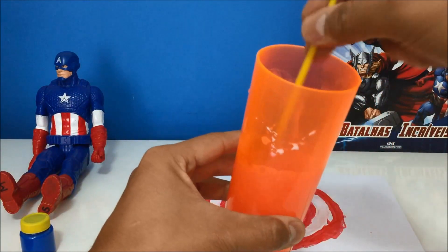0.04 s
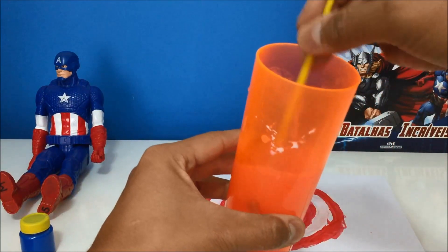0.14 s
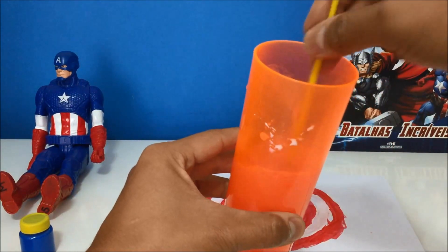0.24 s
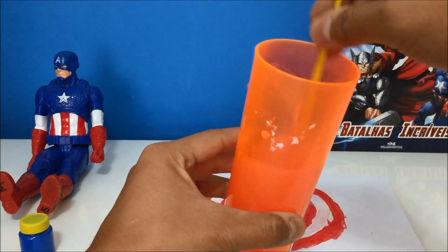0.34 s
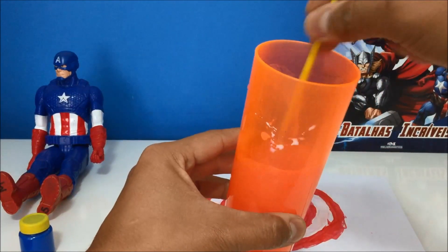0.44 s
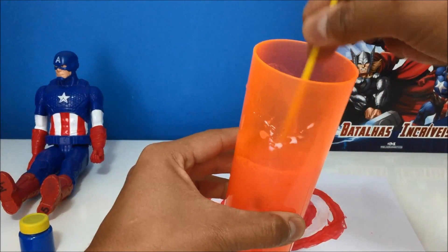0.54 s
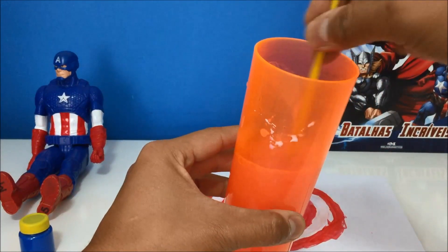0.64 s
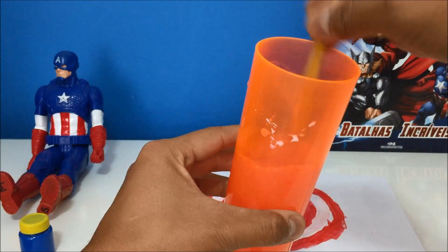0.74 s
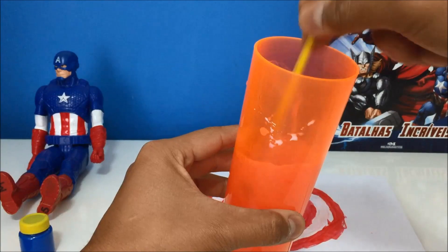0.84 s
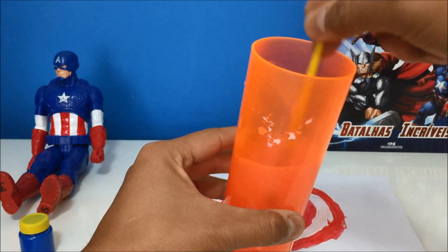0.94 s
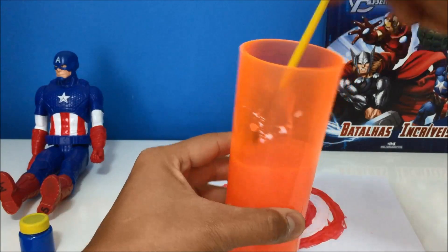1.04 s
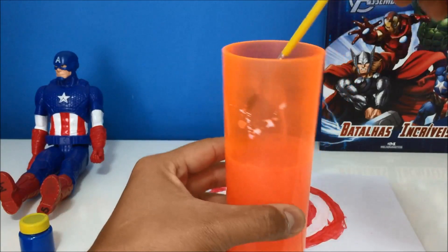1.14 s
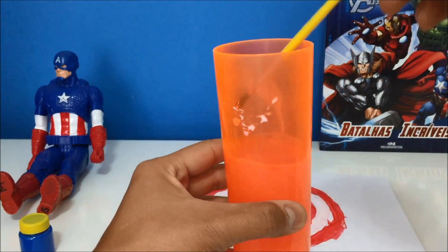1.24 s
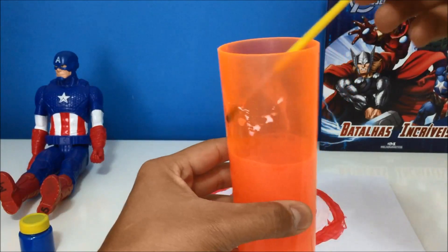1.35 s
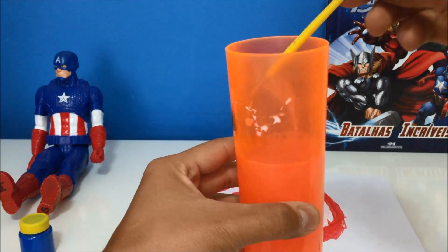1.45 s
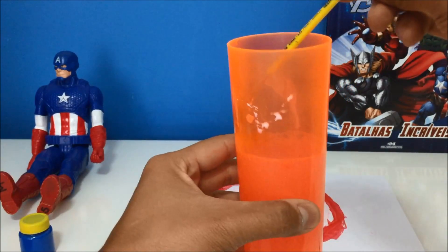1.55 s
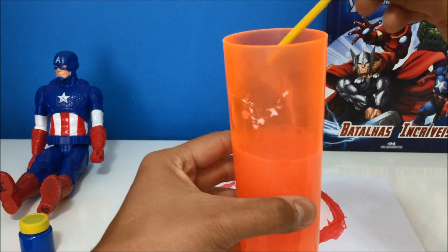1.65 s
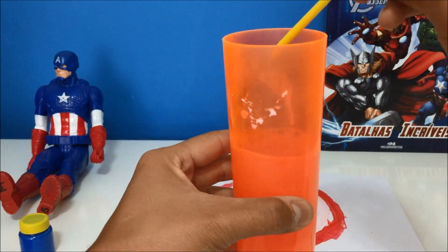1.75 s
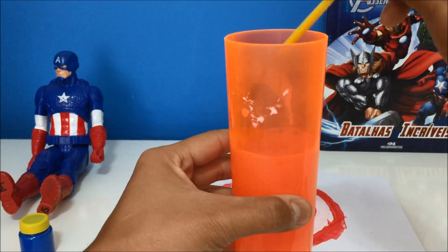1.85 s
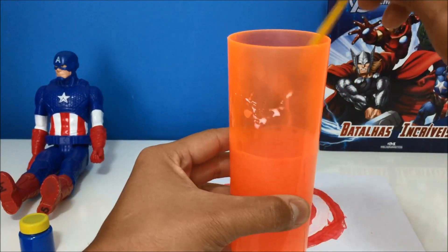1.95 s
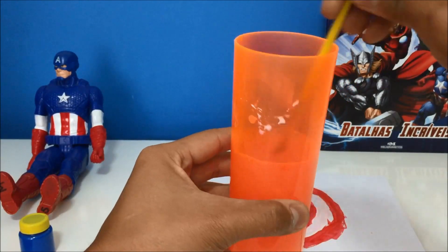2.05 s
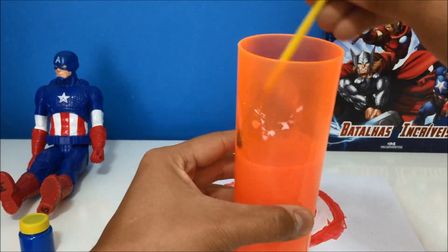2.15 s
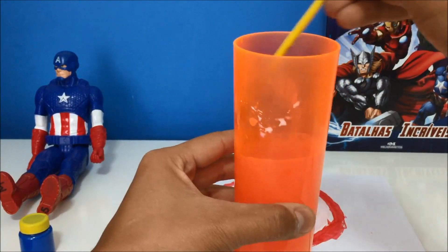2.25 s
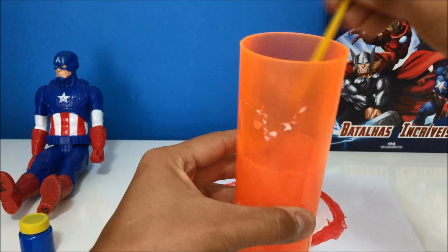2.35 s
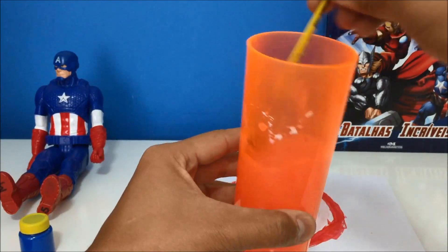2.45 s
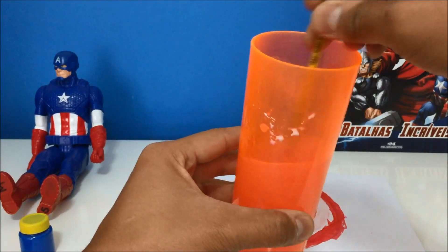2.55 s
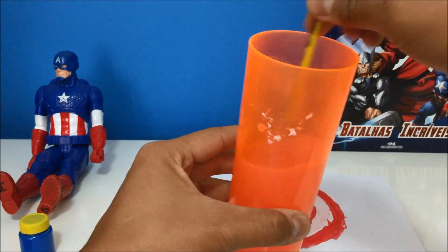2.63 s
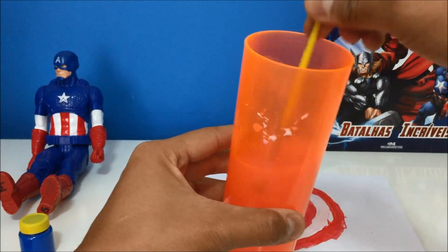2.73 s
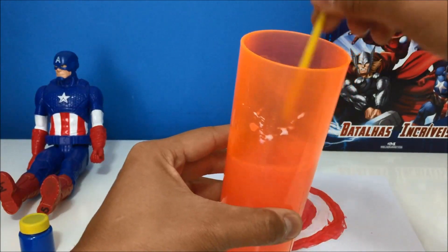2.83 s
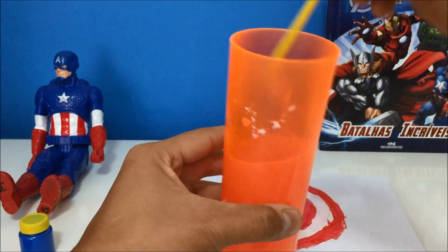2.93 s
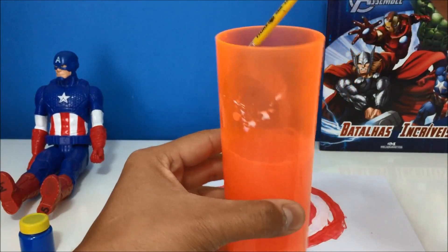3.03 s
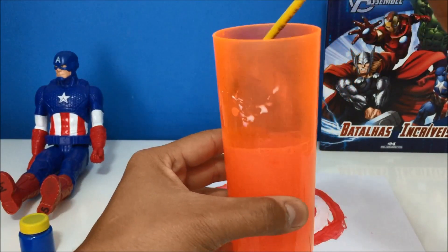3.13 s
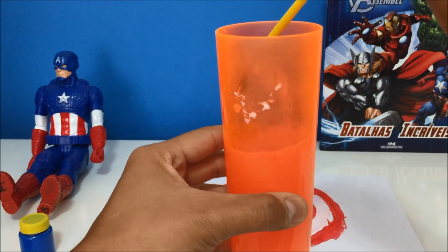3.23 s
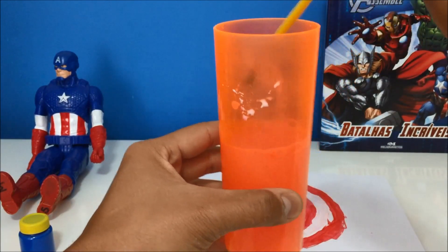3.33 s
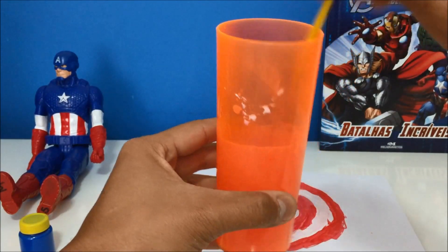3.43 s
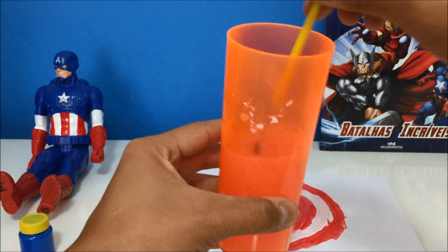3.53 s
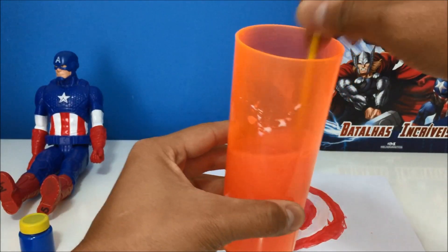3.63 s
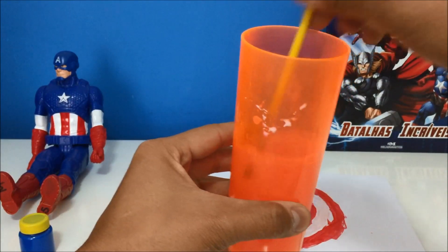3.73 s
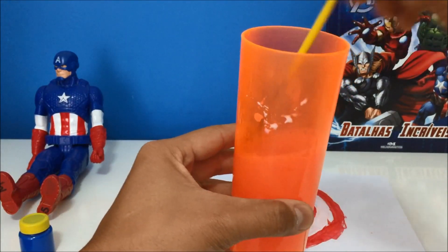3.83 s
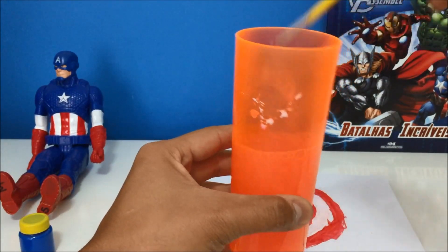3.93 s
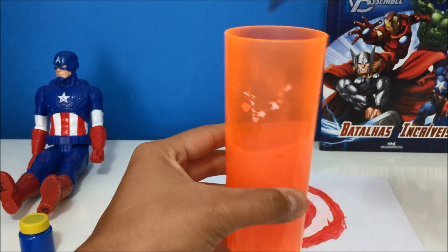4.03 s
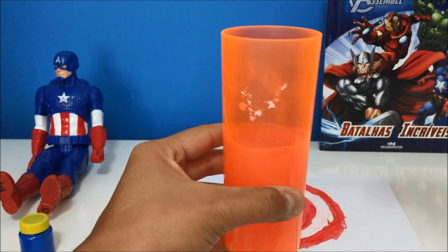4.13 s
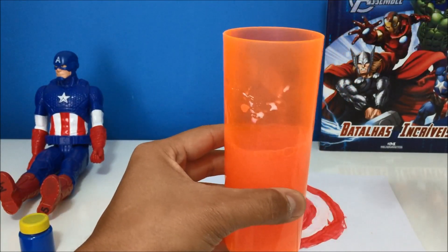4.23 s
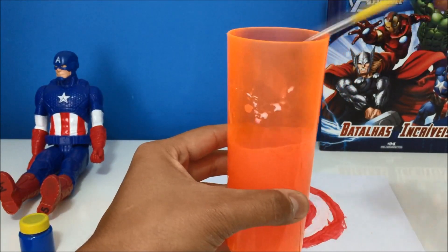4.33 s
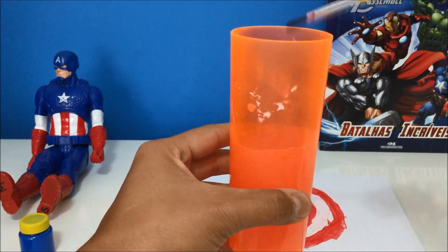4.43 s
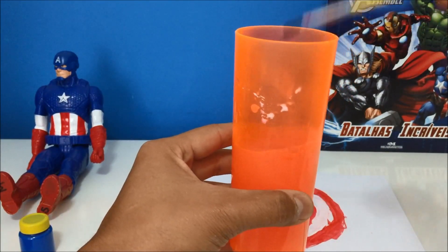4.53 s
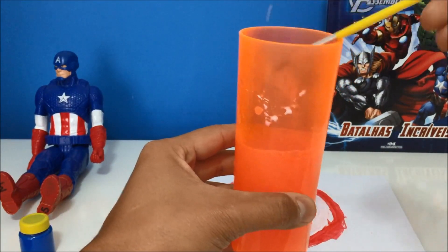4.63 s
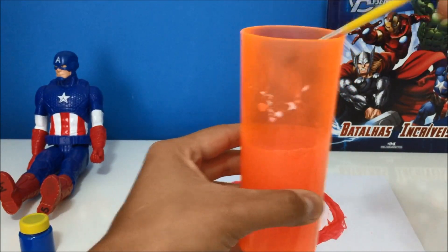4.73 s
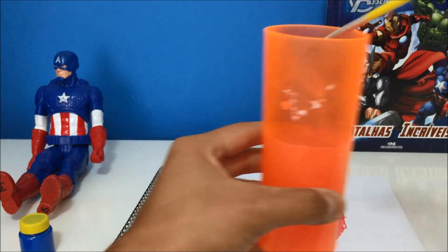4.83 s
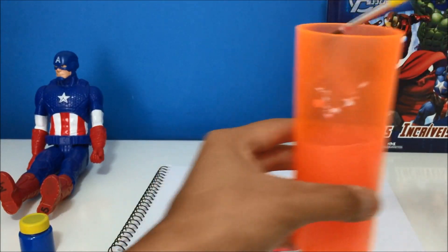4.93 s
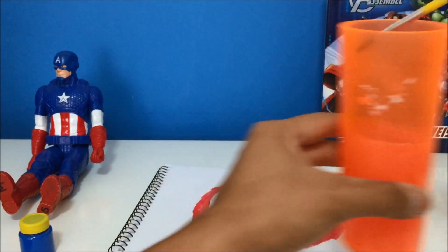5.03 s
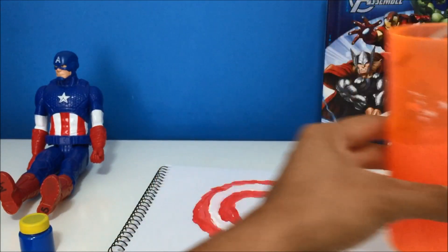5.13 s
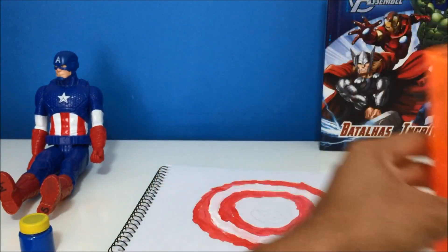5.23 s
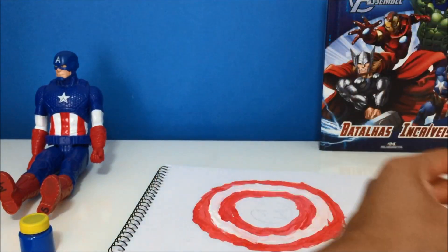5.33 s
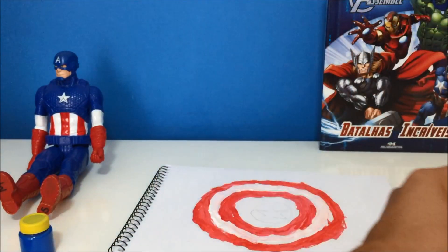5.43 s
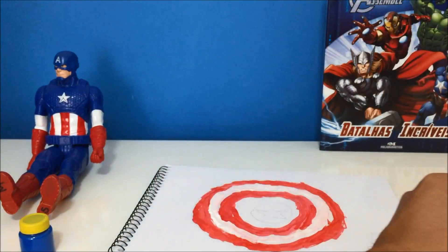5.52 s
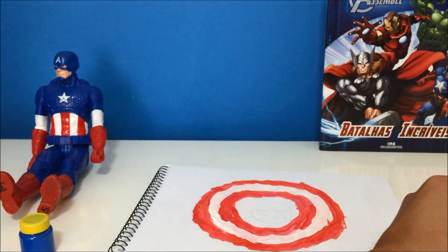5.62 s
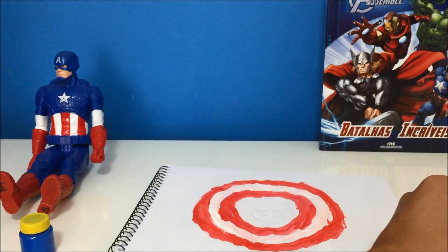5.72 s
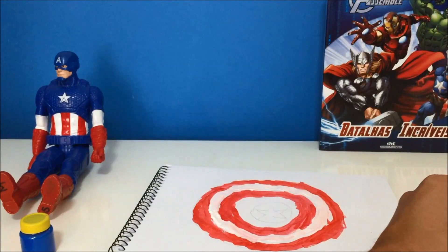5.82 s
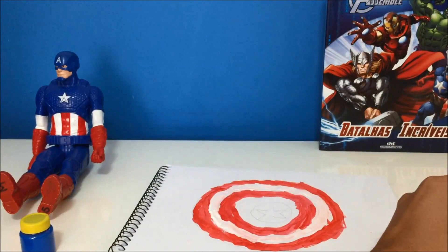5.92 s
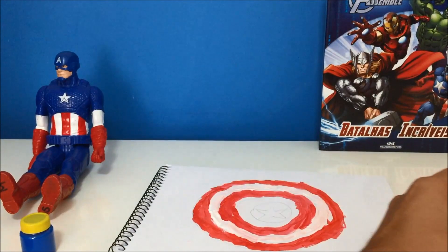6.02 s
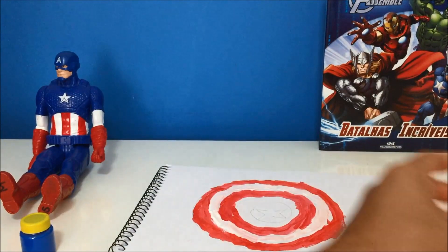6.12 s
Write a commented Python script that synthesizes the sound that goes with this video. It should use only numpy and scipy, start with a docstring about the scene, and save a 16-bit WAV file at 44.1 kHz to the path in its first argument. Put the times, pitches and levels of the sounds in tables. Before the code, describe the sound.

Close by in a small, quiet room, water slaps and gurgles as a brush is swished around a plastic cup. The water settles, giving way to short, soft scrapes and scattered plastic clicks. The handle strikes the rim four times in quick succession, then the cup lands on the table with a low thud and a few slight bumps. Traffic rumbles faintly outside.

```python
"""A paintbrush is stirred in a tall plastic cup of water, then wiped and tapped on the wall and rim.
Slaps of water make the air in the cup ring and ping, and bubbles chirp. The bristles rasp as they slip,
and the handle makes the thin wall ring. The cup is set down and the table booms.
Traffic rumbles faintly outside the small room."""
import sys
import numpy as np
from scipy import signal
from scipy.fft import rfft, irfft
from scipy.io import wavfile
from scipy.ndimage import uniform_filter1d

SR = 44100
rng = np.random.default_rng(int(sys.argv[2]) if len(sys.argv) > 2 else 0)


def digitize_waveform(pressure):
    """Quantize a signal to 16-bit integers and store it at the path in sys.argv[1].

    Rows of a 2-D input are taken as channels; values are limited to [-1, 1].
    """
    field = np.atleast_2d(pressure).T
    bounded = np.clip(field, -1, 1)
    quanta = np.round(bounded * 32767).astype(np.int16)
    wavfile.write(sys.argv[1], SR, quanta)


N = 272137

# the plastic wall's own tones; a ring time is how long a tone takes to fade by 60 dB:
# (pitch [Hz], level [dB], ring time [s])
WALL_TONES = [(760, -33, 0.044), (886, -26, 0.11), (1290, -21.5, 0.058), (1603, -16, 0.14),
              (1722.4, -7, .1), (2041, -3.5, 0.19), (2327, -9, 0.12), (2689, 7, 0.07), (2950, -2.5, 0.11),
              (3558, -6, .06), (3650, -4, 0.074), (4230, -9.5, .06), (4240, -17, 0.039), (4370, -12, 0.093),
              (4520, -7, .1), (4580, -3, .13), (4650, -7, .11), (5300, -11.5, 0.06), (5560, -9, 0.074),
              (5700, -8.5, 0.036), (6270, -2.5, 0.15), (8060, -14.5, .04), (7874, -15, 0.064),
              (8630, -3, 0.011), (10370, -9.5, 0.1), (9670, -5.5, .04), (11650, -15, 0.039),
              (15100, -22.5, 0.029)]
# tone colour of something touching the wall: (frequency [Hz], level [dB])
CONTACT_COLOUR = [(300, -67.5), (600, -36), (1400, -19.5), (2000, -24.5), (2700, -10), (3200, -9),
                  (3700, -4), (4600, -4.5), (5200, -8), (6300, -6.5), (8000, -8.5), (9800, -8.5),
                  (11500, -14.5), (15000, -16)]


def gain_of(db):
    """Turns decibels into a number to multiply by."""
    return 10 ** (np.asarray(db) / 20)


def evened(x):
    """Scales a signal to an average (rms) strength of 1."""
    return x / np.sqrt(np.mean(x ** 2) + 1e-20)


def peak_one(x):
    """Scales a signal so that its biggest swing is 1."""
    return x / abs(x).max()


def read(points, hz):
    """Looks up a table between its frequencies, spaced by octaves."""
    f, value = np.transpose(points)
    return np.interp(np.log(hz + 1), np.log(f + 1), value)


def add(mix, start, sound):
    """Mixes a sound in at a start time in seconds."""
    part = mix[round(start * SR):][:len(sound)]
    part += sound[:len(part)]


def coloured(x, colour, tilt_db=0):
    """Filters by a tone colour table, tilted by tilt_db per octave around 5 kHz."""
    hz = np.fft.rfftfreq(len(x), 1 / SR)
    return irfft(rfft(x) * gain_of(read(colour, hz) + tilt_db * np.log2((hz + 100) / 5000)), len(x))


def resonate(x, hz, width_hz):
    """Keeps a band around a pitch that may move: shift it to zero, smooth twice, shift back."""
    turn = np.exp(2j * np.pi * np.cumsum(hz * np.ones(len(x))) / SR)
    pole = [1, -np.exp(-np.pi * width_hz / SR)]
    return (turn * signal.lfilter([1], np.convolve(pole, pole), x / turn + 1e-18)).real


def ring(tones, chance, tilt_db, seconds, spot_db):
    """A struck object's fading tones; the spot that is hit favours some of them."""
    hz, db, ring_s = np.transpose(tones)[:, :, None]
    phase, favour = chance[:, :, None]
    t = np.arange(round(seconds * SR)) / SR
    level_db = db + spot_db * favour + tilt_db * np.log2(hz / 5000) - 60 * t / ring_s
    return peak_one((gain_of(level_db) * np.sin(2 * np.pi * (hz * t + phase))).sum(0))


def plip(hz, fade_s, octaves, spray):
    """A short gliding tone blended with spray, a burst of noise near the same pitch."""
    t = np.arange(round(1.6 * fade_s * SR) + 2) / SR
    tone = np.sin(2 * np.pi * np.cumsum(hz * 2 ** (octaves * t / fade_s)) / SR)
    rise = np.clip(t / (0.059 * fade_s), 0, 1)
    fade = np.exp(-2.2 * (t / fade_s) ** 1.3)
    noise = resonate(rng.standard_normal(6000)[:len(t)] * fade, hz, 0.37 * hz)
    spray = np.clip(spray, 0, 1)
    return (1 - spray) * tone * rise * fade + spray * peak_one(noise)


def hum(hz, width_hz):
    """A wavering tone made from a narrow band of noise."""
    return evened(resonate(rng.standard_normal(N), hz, width_hz))


def hiss():
    """The steady, soft noise of the room and the microphone."""
    # tone colour of the hiss: (frequency [Hz], level [dB])
    colour = [(30, -21), (55, 3), (160, -2), (290, -5.5), (550, -17), (2300, -16.5), (4600, -24.5),
              (6400, -24.5), (9500, -27), (11000, -29.5), (15500, -29.5)]
    return gain_of(-66) * evened(coloured(rng.standard_normal(N), colour))


def traffic():
    """Engines rumble, drone and throb far away; tyres roar as each car passes."""
    # distant engines: (time [s], rumble [dB], drone pitch [Hz], drone [dB], deep throb [dB])
    engines = [(0, -64, 90.3, -50.5, -66), (.36, -64, 86, -55.5, -68), (.5, -63.5, 95, -60, -66),
               (1.02, -71, 92.5, -66, -67), (1.13, -62, 91, -56, -59), (1.36, -59, 90, -48.5, -61),
               (1.55, -58.5, 105, -51, -65), (1.82, -58, 111, -56, -58.5), (2, -62.5, 96, -54, -61),
               (2.42, -66, 90.6, -51, -62), (2.6, -68.5, 90.7, -63.5, -76), (2.82, -65.5, 92, -65.5, -57.5),
               (3.12, -72, 92, -75, -75), (3.23, -66, 90.5, -71, -51), (3.5, -71.5, 87, -69, -75),
               (3.75, -68.5, 91, -67.5, -69), (4.6, -74.5, 95, -83, -70),
               (4.849, -68.5, 96.5, -59.5, -67.5), (5.45, -64.5, 92, -61, -67.5),
               (5.6, -59.5, 92.5, -54, -67), (6.17, -56, 92.4, -61, -66)]
    # passing cars: (time when closest [s], level [dB], time to fall 6 dB [s])
    cars = [(1.62, -63, 0.63), (4.85, -69.5, -0.07), (5.651, -71, 0.59)]
    # tone colour of the rumble: (frequency [Hz], level [dB])
    rumble_colour = [(40, -15.5), (70, -9), (130, -5), (200, -7.5), (260, 2), (330, -9), (420, -18),
                     (600, -18.5), (900, -51)]
    # tone colour of the tyres: (frequency [Hz], level [dB])
    tyre_colour = [(240, -22), (400, 7), (526, -21.5), (630, 1), (1020, -0.5), (1380, -0.5), (5000, -22),
                   (6500, -54.5), (11000, -120)]
    t = np.arange(N) / SR
    times, *curves = np.transpose(engines)
    rumble_db, drone_hz, drone_db, throb_db = (np.interp(t, times, curve) for curve in curves)
    nearness = sum(gain_of(db) / (1 + ((t - closest) / fall) ** 2) for closest, db, fall in cars)
    rumble = evened(coloured(rng.standard_normal(N), rumble_colour))
    roar = evened(coloured(rng.standard_normal(N), tyre_colour))
    drone = hum(drone_hz, width_hz=11) + 0.7 * hum(150, width_hz=45)
    waver_db = evened(uniform_filter1d(uniform_filter1d(rng.standard_normal(N), 3000), 3000))
    whine = gain_of(-13) * hum(625, width_hz=21)
    throb = hum(52, width_hz=22)
    tyres = nearness * gain_of(waver_db) * (roar + whine)
    return gain_of(rumble_db) * rumble + gain_of(drone_db) * drone + gain_of(throb_db) * throb + tyres


def splashing():
    """Stirring makes a random patter of droplets and a murmur of the air in the cup."""
    # strength of the fine splashing: (time [s], level [dB])
    strength = [(0.0, -54.5), (0.146, -60), (0.3, -54), (0.56, -60.5), (0.714, -61), (0.848, -67.5),
                (1.052, -62), (1.15, -91)]
    times, db = np.transpose(strength)
    patter, size = np.zeros(N), round(times[-1] * SR)
    for hz in np.geomspace(1200, 11000, 24):
        drops = gain_of(8.5 * np.minimum(rng.exponential(1, size), 3))
        drops *= rng.random(size) < 25 / SR  # about 25 a second at each pitch
        droplet = plip(hz, fade_s=25 / hz, octaves=0.21, spray=0.5)
        patter[:size] += signal.oaconvolve(drops, droplet)[:size] * (hz / 1000) ** -0.6
    murmur = gain_of(-4.5) * hum(950, width_hz=58)
    level = gain_of(np.interp(np.arange(N) / SR, times, db, right=-120))
    return level * (patter / patter[:size].std() + murmur)


def slaps():
    """The air above the water rings like a pipe closed at the bottom, with a main and a higher tone."""
    # slaps of water: (time [s], level [dB], pitch [Hz], ring time [s])
    hits = [(.009, -31, 990, 0.041), (.038, -36, 950, .067), (0.055, -42, 922, 0.24),
            (0.085, -33, 1044, .03), (.113, -30.5, 850, 0.036), (.149, -11.5, 955, 0.029),
            (.164, -21.5, 852, 0.039), (0.219, -27.5, 960, 0.048), (.244, -29, 1020, 0.023),
            (.269, -29.5, 955, 0.057), (.285, -28, 963, 0.05), (0.341, -33.5, 1013, 0.059),
            (.364, -40.5, 942, 0.11), (0.413, -23, 1070, 0.033), (.473, -17.5, 995, .028),
            (.489, -29, 945, 0.036), (.537, -21.5, 918, 0.078), (.593, -24, 938, 0.055),
            (0.657, -32.5, 1060, 0.049), (.675, -9.5, 949.6, 0.037), (0.698, -35, 954, 0.08),
            (.727, -28.5, 949, 0.093), (.797, -37, 1050, 0.077), (0.821, -36.5, 1063, 0.039),
            (.905, -41.5, 1012, 0.063), (0.937, -30, 1010, 0.044), (.988, -36.5, 962, 0.045),
            (1.015, -36.5, 1270, 0.024), (1.06, -44, 940, 0.043), (1.096, -44, 1220, 0.041),
            (2.7912, -18, 1093, 0.02)]
    out, t = np.zeros(N), np.arange(8000) / SR
    for start, db, hz, ring_s in hits:
        rise_s = 0.0051 * (950 / hz) ** 2.8  # higher slaps rise faster
        swell = np.sin(np.pi / 2 * np.clip(t / rise_s, 0, 1)) ** 2
        surface = evened(uniform_filter1d(rng.standard_normal(len(t)), 300))
        bent_time = np.cumsum(1 + 0.024 * surface) / SR  # the moving surface bends the pitch
        main = np.sin(2 * np.pi * hz * bent_time)
        upper = gain_of(-20 - 30 * t / ring_s) * np.sin(2 * np.pi * 2850 * bent_time)
        add(out, start, swell * gain_of(db - 60 * t / ring_s) * (main + upper))
    return out


def chirps_and_pings():
    """Bubble chirps, and short pings of the cup air's higher tone as water slaps."""
    # bubble chirps and air pings (those near 2800 Hz that come with a slap):
    # (time [s], level [dB], starting pitch [Hz], fade time [s], rise in that time [octaves])
    plips = [(0.035, -40, 1596, 0.048, -0.3), (.064, -48, 13500, 0.0043, .01),
             (0.084, -37.5, 2810, .018, -0.077), (0.092, -31, 3990, 0.0086, -0.25),
             (0.127, -46.5, 6300, 0.013, -0.14), (.147, -29, 2770, 0.021, -1.02),
             (.155, -21, 1200, .015, 0.91), (.164, -44.5, 8360, .009, -0.15), (.171, -25, 2590, 0.0093, .2),
             (.184, -30, 3090, 0.0087, 0.25), (0.187, -45, 5900, 0.0077, -.09),
             (0.215, -29.5, 1900, 0.012, 0.43), (0.222, -32, 2184, 0.02, -0.07),
             (0.245, -39, 4360, .011, 0.12), (.269, -35, 2700, 0.0081, .1), (.27, -53, 6000, 0.0039, -0.16),
             (0.28, -27, 3740, .0091, -0.0054), (.305, -46, 6900, 0.0041, .05),
             (0.317, -41.5, 4900, 0.016, -.19), (0.331, -38, 2810, .011, .05),
             (.339, -36, 1980, 0.0073, -0.052), (.34, -31.5, 3000, .015, -.2),
             (.341, -40, 6800, .0095, -0.63), (.398, -42, 3150, .016, 0.24),
             (.406, -33, 5650, 0.0089, 0.25), (.407, -27, 2754, 0.025, -.09),
             (0.465, -45, 7700, .006, -0.051), (.4735, -32, 2950, 0.0037, -0.21),
             (0.4737, -22, 1490, 0.011, -0.49), (.483, -42.5, 5240, 0.01, -0.23),
             (.506, -41.5, 8050, 0.0049, 0.49), (0.53, -41, 3860, 0.012, 0.43),
             (0.535, -29, 1426, 0.014, -0.76), (.542, -39, 9700, .006, 0.42),
             (.595, -27.5, 1480, .019, -0.47), (.607, -43.5, 3200, 0.022, -0.34),
             (0.61, -46, 8270, 0.01, 0.16), (.668, -35, 5350, 0.0079, -0.29),
             (0.671, -28, 2870, 0.01, -0.24), (.716, -42, 3340, .008, -0.23),
             (0.7276, -34, 1760, 0.015, -0.048), (0.73, -35, 3230, 0.017, -0.075),
             (.797, -38.5, 1510, 0.011, -0.21), (.798, -39, 3160, 0.011, 0.09),
             (.9, -46, 2800, .011, -0.21), (.911, -49.5, 2200, 0.02, 0.022),
             (0.938, -36, 3790, 0.014, 0.33), (.948, -45, 1960, 0.016, 0.049),
             (1.017, -42, 1620, 0.017, .22), (1.033, -49, 2770, .012, -.02), (1.098, -47, 1710, 0.01, -0.1),
             (2.79, -40, 1284, 0.013, 0.38), (2.792, -36, 2805, .011, 0.29),
             (3.8, -51.5, 1030, 0.026, -0.085), (3.802, -42.5, 1757, 0.036, .29),
             (3.827, -46, 1104, .034, .1)]
    out = np.zeros(N)
    for start, db, hz, fade_s, octaves in plips:
        spray = 0.44 + 0.094 * np.log2(hz / 2000)  # higher ones are noisier
        add(out, start, gain_of(db) * plip(hz, fade_s, octaves, spray))
    return out


def taps():
    """The handle rattles against the cup for an instant: a crack, a ringing wall, a knocking handle."""
    # taps: (time [s], level [dB], brightness [dB per octave], contact time [s], wall ring [dB],
    # ring time [factor], handle pitch [Hz], handle knock [dB], first hard touch [dB])
    hits = [(.217, -34, -5, 0.0033, -17, .54, 10160, 1.3, -12),
            (0.6287, -17.5, -0.4, 0.0051, -29, .61, 4770, -5.5, -5.5),
            (2.1268, -18, 1.8, 0.0037, -2.5, 0.63, 1400, -20, -2),
            (2.2672, -14.5, 6, 0.0061, -4, 0.5, 6300, -11, 0),
            (2.458, -15, -1.5, 0.0061, -3.5, 0.38, 1060, -24, -11),
            (2.5451, -19, 2, 0.008, -5.5, 0.61, 1570, -47, -12),
            (3.587, -28, -4.3, 0.011, -8.5, 0.73, 1037, -24, -8),
            (3.8222, -14, 0.5, 0.0054, -20.5, 0.74, 5740, -2.5, 2.5),
            (4.4698, -3, 3.5, .0029, -7, 0.81, 696, -49, -15.5),
            (4.605, -6.5, 0, 0.003, -2, 0.69, 710, -40, -14.5),
            (4.7349, -5, -0.9, 0.0037, -2, 0.71, 710, -37.5, -14),
            (4.8645, -5, -0.5, 0.0026, -5, .8, 700, -36.5, -14)]
    out, t = np.zeros(N), np.arange(12000) / SR
    lead_s = 0.002
    age = t - lead_s
    for start, db, tilt_db, contact_s, ring_db, ring_factor, knock_hz, knock_db, touch_db in hits:
        rattle = np.exp(-(age / contact_s) ** 2) + 0.39 * np.exp(-t / 0.009)
        rattle *= np.clip(age / 0.0011, 0, 1)
        spike = np.gradient(np.exp(-((t - 0.0028) / 0.00003) ** 2))
        touch = gain_of(touch_db) * peak_one(coloured(spike, CONTACT_COLOUR))
        crack = peak_one(coloured(rng.standard_normal(len(t)) * rattle, CONTACT_COLOUR, tilt_db))
        tones = np.multiply(WALL_TONES, [1, 1, ring_factor])
        wall = ring(tones, rng.random((2, len(tones))), tilt_db, len(t) / SR, spot_db=6.5)
        wall *= np.clip(age / 0.0016, 0, 1)
        knock = peak_one(resonate(rng.standard_normal(len(t)) * rattle, knock_hz, 0.15 * knock_hz))
        tap = touch + 1.114 * crack + gain_of(ring_db) * wall + gain_of(knock_db) * knock
        tap = coloured(tap, [(450, -27), (680, -0.5)])  # a thin wall gives off little bass
        add(out, start - lead_s, gain_of(db) * tap)
    return out


def wipes():
    """Bristles make many tiny slips in uneven clumps: grainy noise that rasps and rings the wall."""
    # brush strokes along the wall: (start [s], end [s], first level [dB], last level [dB],
    # brightness [dB per octave], final rasp pitch [Hz])
    strokes = [(0.62, .724, -75, -80, 7, 4200), (1.533, 1.62, -73, -65, 7, 9100),
               (1.606, 1.65, -67, -55.5, 7.5, 7400), (1.821, 1.92, -66, -78, 5, 9600),
               (1.963, 2.144, -71.5, -45.5, 2, 4670), (2.133, 2.261, -66, -49.5, 6, 6000),
               (2.347, 2.479, -60, -43.5, 5.5, 3500), (2.583, 2.655, -54, -51.5, -1, 3500),
               (2.689, 2.722, -62, -49.5, 3, 2730), (3.193, 3.259, -69, -65.5, 6, 10100),
               (3.296, 3.465, -68.5, -78, -1, 3700), (3.428, 3.582, -66.5, -49, 5.5, 3300),
               (3.584, 3.636, -34.5, -67, 4.3, 4000), (3.794, 3.818, -56, -66, 5, 2980),
               (4.425, 4.465, -84, -58, -6, 3000), (6.04, 6.109, -71, -71, 1.1, 5000)]
    out = np.zeros(N)
    for start, end, first_db, last_db, tilt_db, rasp_hz in strokes:
        size = round((end - start) * SR)
        chance = rng.random((2, len(WALL_TONES)))
        wall = ring(WALL_TONES, chance, 9.5 + tilt_db, seconds=0.0029, spot_db=6.5)
        wall *= np.exp(-np.arange(len(wall)) / SR / 0.0052)  # wet bristles muffle the wall
        grain, clumps, slips = rng.standard_normal((3, 9000))[:, :size]
        grain_db = 2.4 * evened(uniform_filter1d(grain, 60))
        clump_db = 2 * evened(uniform_filter1d(clumps, 600))
        slips = slips * gain_of(grain_db + clump_db)
        glide_hz = rasp_hz * np.geomspace(1.2, 1, size)  # sinks as the bristles bend
        rasp = evened(resonate(slips, glide_hz, width_hz=1200))
        scrape = evened(coloured(slips, CONTACT_COLOUR, tilt_db))
        ringing = evened(signal.oaconvolve(slips, wall)[:size])
        level = gain_of(np.linspace(first_db, last_db, size)) * signal.windows.tukey(size, 0.35)
        add(out, start, level * evened(scrape + 1.2 * ringing + gain_of(-5) * rasp))
    return out


def table_knocks():
    """The table top booms as the cup is set down; the plastic base adds a dull click."""
    # cup base and hand meeting the table: (time [s], level [dB], click against boom [dB])
    hits = [(5.733, -12, -31.5), (5.7557, -15, -25), (5.778, -30.5, -22), (5.813, -39, -26),
            (5.857, -42, -34), (5.879, -32.5, -40), (5.909, -37.5, -38), (6.013, -32.5, -39),
            (6.099, -28.5, -30.5), (6.145, -43, -37)]
    # tones of the table top and cup base: (pitch [Hz], level [dB], ring time [s])
    tones = [(89, -8.5, 0.17), (126.5, 1.5, 0.21), (175.7, -8, 0.28), (215, 0.5, 0.19), (269.7, 1, 0.27),
             (311.5, 11, 0.092), (380, -10.5, 0.15), (501, -22.5, 0.096), (720, -31.5, 0.075),
             (969, -13.5, .1), (1430, -24, 0.11), (1710, -28, 0.22), (2058, -25.5, 0.11), (2180, -34, 0.2),
             (3300, -33, 0.079), (4400, -24, 0.038)]
    click_colour = [(300, 5.5), (900, 1.5), (2200, -13.5), (4600, -26), (8000, -49)]
    out, t = np.zeros(N), np.arange(14000) / SR
    swell = np.sin(np.pi / 2 * np.clip(t / 0.0044, 0, 1)) ** 2
    for start, db, click_db in hits:
        chance = rng.random((2, len(tones))) * [[0], [1]]  # every tone starts from rest
        boom = swell * ring(tones, chance, tilt_db=0, seconds=len(t) / SR, spot_db=-2.5)
        click = evened(coloured(rng.standard_normal(len(t)), click_colour))
        click *= gain_of(click_db - 60 * t / 0.08) * np.clip(t / 0.0015, 0, 1)
        add(out, start, gain_of(db) * (boom + click))
    return out


def room(x):
    """Near walls send back a blur of echoes, each frequency band fading at its own speed."""
    # how long the room rings: (frequency [Hz], ring time [s])
    ring_times = [(300, 0.2), (2000, 0.21), (6000, 0.2), (14000, 0.18)]
    hz, t, bands = signal.stft(rng.standard_normal(SR // 2), SR, nperseg=128)
    fade = gain_of(-60 * t / read(ring_times, hz)[:, None])
    tail = signal.istft(bands * fade, SR, nperseg=128)[1]
    tail = np.append(np.zeros(150), tail)  # a short wait for the first echo
    return signal.fftconvolve(x, tail / np.linalg.norm(tail))[:N]


def scene():
    """Water, brush and table share the room's echo, over the hiss and traffic."""
    water = coloured(slaps() + chirps_and_pings() + splashing(), [(450, -1.5), (750, 0)])
    handle, bristles, table = taps(), wipes(), table_knocks()
    echo = room(gain_of(-10) * water + gain_of(-8.5) * handle + gain_of(-10.5) * (bristles + table))
    return (water + handle + bristles + table + echo + hiss() + traffic())[None]


def record(dry):
    """Turns down the deep bass, dulls the top and cuts off the very highest treble."""
    # overall tone colour: (frequency [Hz], level [dB])
    colour = [(25, -13.5), (45, -0.5), (15600, -0.5), (16000, -25.5)]
    dulled = coloured(dry[0], colour)[None]
    treble_cut = signal.firwin(511, cutoff=16800, window=("kaiser", 9), fs=SR)
    return signal.oaconvolve(dulled, treble_cut[None], "same")


dry = scene()
out = record(dry)
digitize_waveform(out)
```